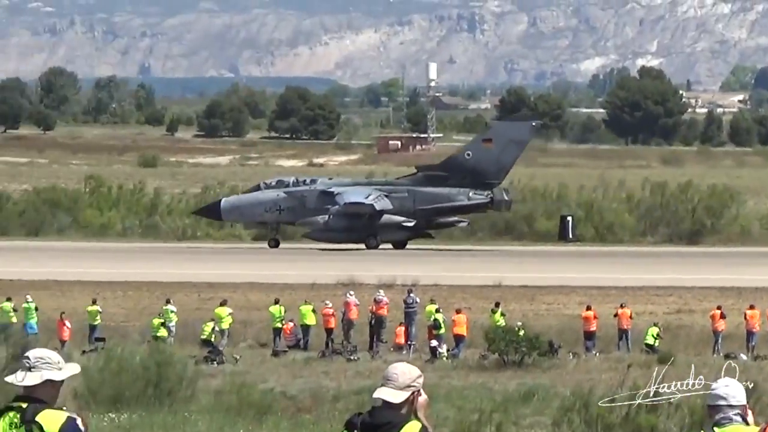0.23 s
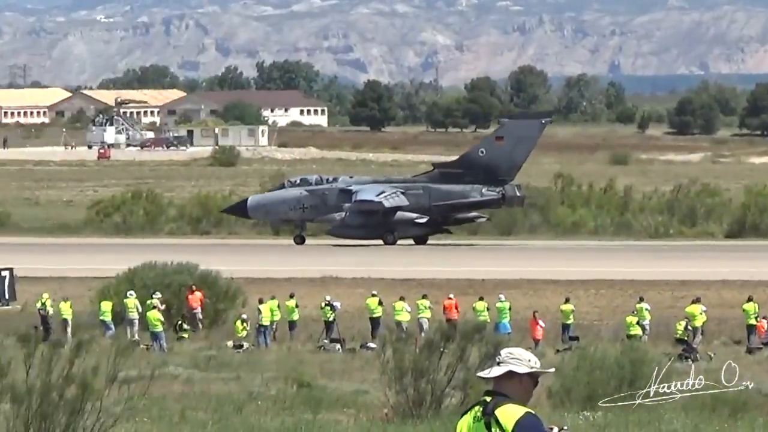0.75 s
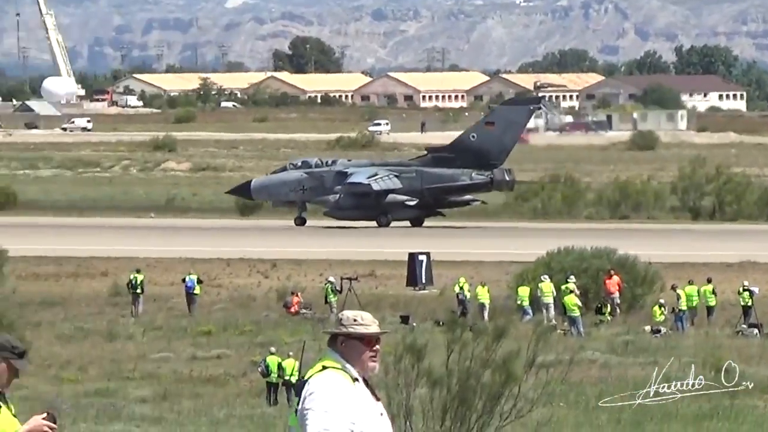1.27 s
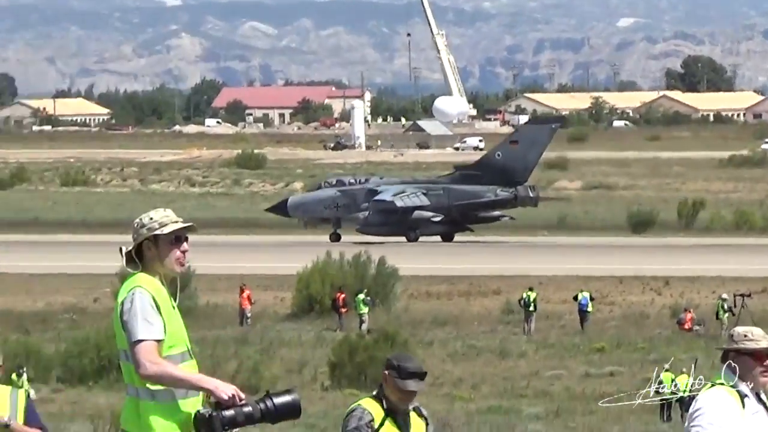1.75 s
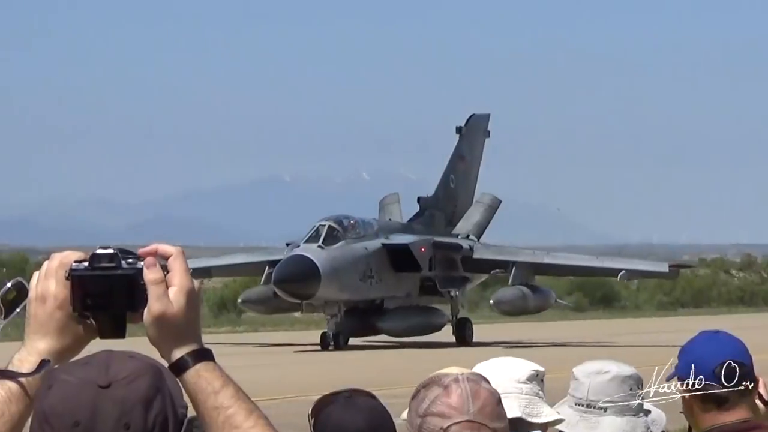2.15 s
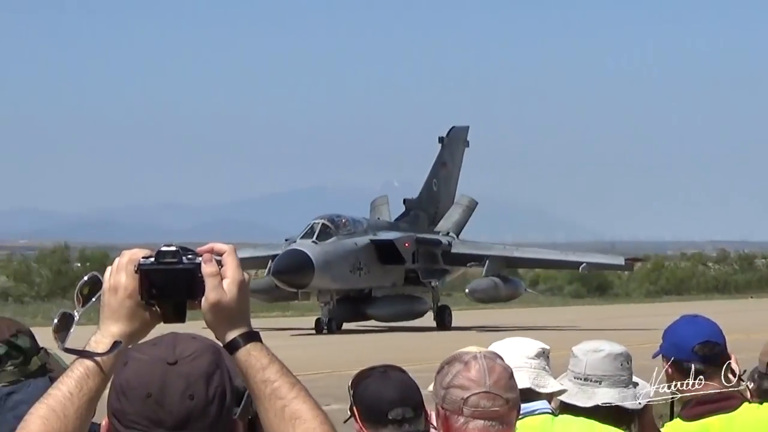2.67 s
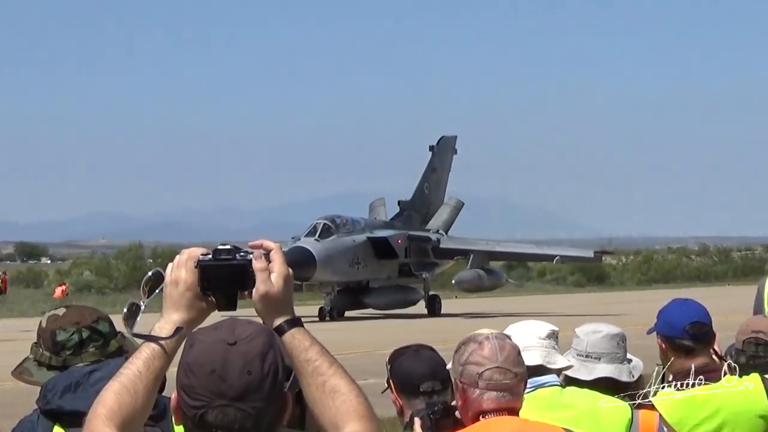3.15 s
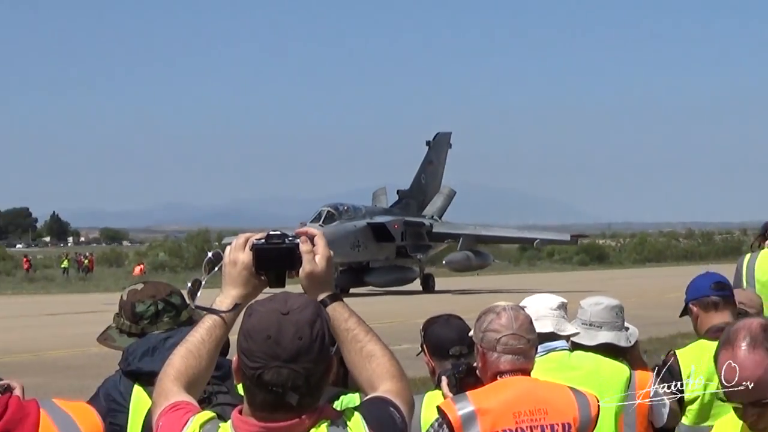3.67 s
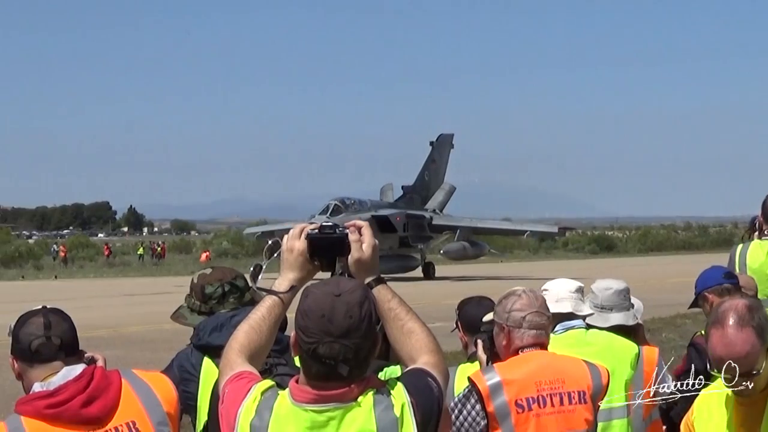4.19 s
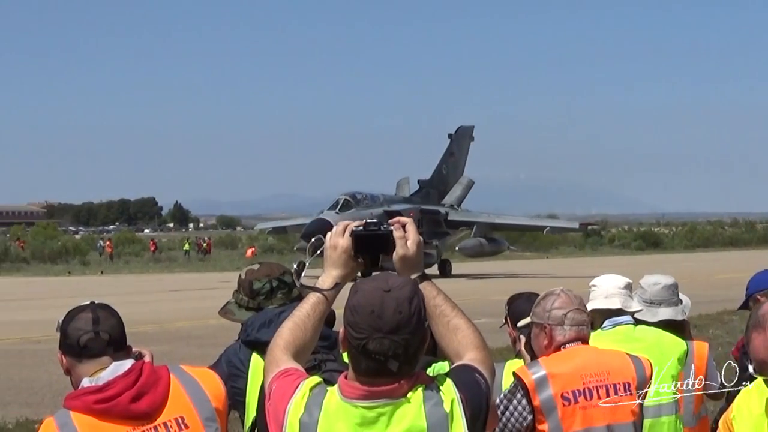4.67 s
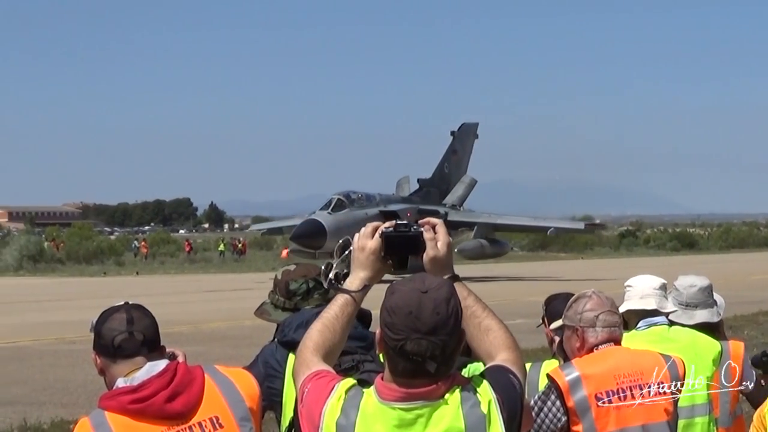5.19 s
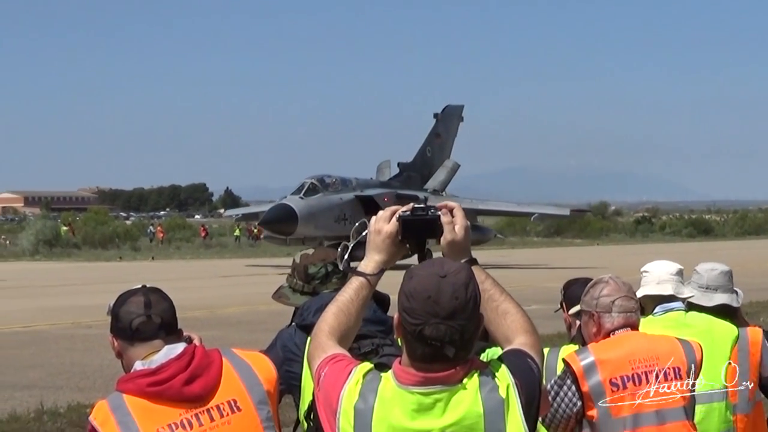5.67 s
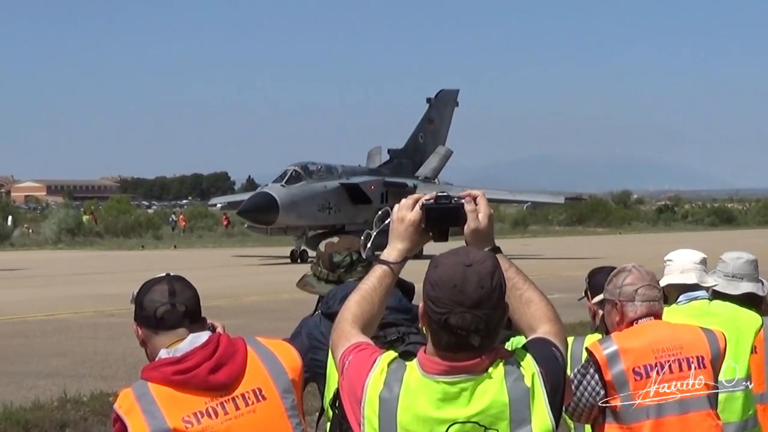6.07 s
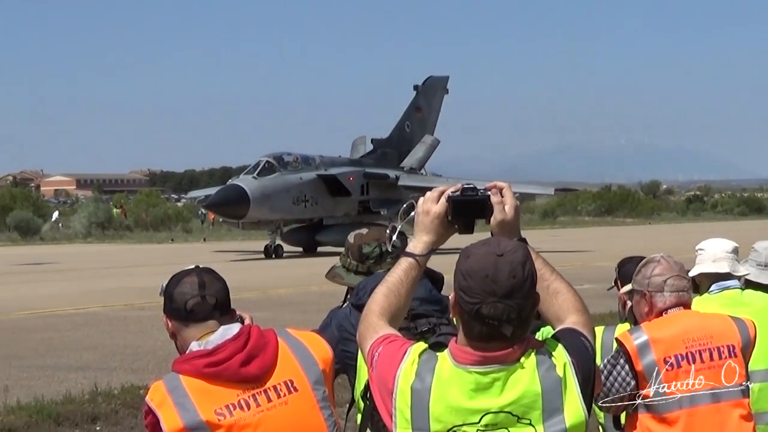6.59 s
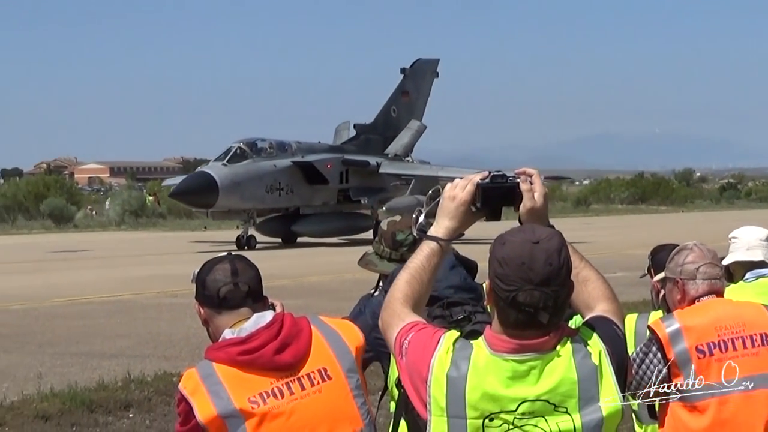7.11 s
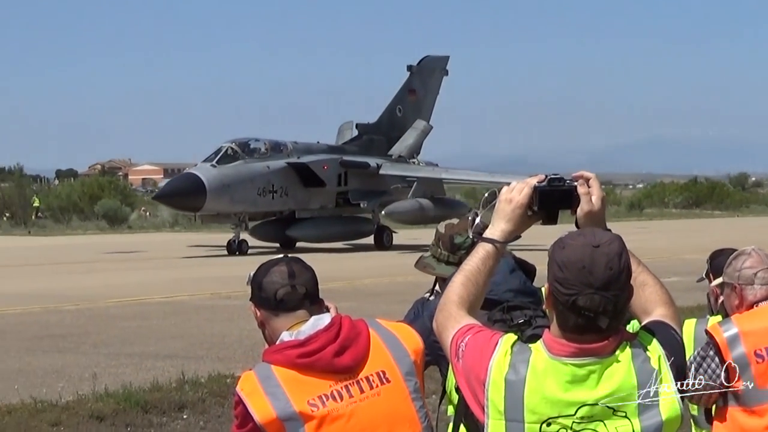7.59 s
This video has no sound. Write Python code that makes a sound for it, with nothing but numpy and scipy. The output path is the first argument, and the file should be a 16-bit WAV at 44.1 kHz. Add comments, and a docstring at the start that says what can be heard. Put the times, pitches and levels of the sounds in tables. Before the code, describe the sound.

Outdoors on an airfield, a distant military jet roars in uneven swells while low wind thumps the microphone and small dry camera shutters click. At about two seconds it switches abruptly to a much closer view: loud shimmering high engine whine, dense hiss and a subdued exhaust rumble, steady until the pitch rises very slightly near the end.

```python
"""Taxiing military jet

A twin-engined military jet taxis on an airfield, heard from two places joined by a brief fade.
Far off and side-on, its exhaust roar is shaped noise swelling in drifting air; low noise buffets the
microphone as wind, and short bursts of noise make the clicks of camera shutters.
Close and nose-on, noise bands and wavering tones make the whine of the intakes, with broadband hiss
over a low exhaust rumble; the engines speed up slightly near the end."""
import sys
import numpy as np
from scipy import signal
from scipy.fft import rfft, irfft, next_fast_len
from scipy.io import wavfile
from scipy.ndimage import uniform_filter1d, map_coordinates

SR = 44100
rng = np.random.default_rng(int(sys.argv[2]) if len(sys.argv) > 2 else 0)


def to_wav(sig):
    """Store sig (one row per channel, or 1-D mono) as 16-bit WAV at the path in sys.argv[1].

    Samples outside -1..1 are clipped; the rate is SR.
    """
    pcm = np.clip(np.atleast_2d(sig), -1, 1) * 32767
    pcm = np.round(pcm).astype(np.int16)
    wavfile.write(sys.argv[1], SR, pcm.T)  # frames by channels


N = 346185

CLOSE_S = 1.945  # the close view begins

# Likeness of left and right in distant sound. Each row: frequency in Hz, correlation (no unit).
FAR_ALIKE = [(100, .7), (280, 0.61), (640, 0.93), (1400, 0.96), (3000, 0.97)]
# Likeness of left and right in close sound. Each row: frequency in Hz, correlation (no unit).
NEAR_ALIKE = [(60, 0.93), (290, 0.91), (700, 0.94), (1100, 0.97), (1400, .999), (4000, 0.96), (7000, 0.95),
              (7600, 1)]


def amp(db):
    """Decibels to amplitude ratio: 20 dB is a factor of ten."""
    return 10 ** (np.asarray(db) / 20)


def unit(x):
    """Normalisation to a root-mean-square value of 1."""
    return x / np.sqrt(np.mean(x ** 2) + 1e-20)


def clock():
    """Sampled time in seconds."""
    return np.arange(N) / SR


def since_close():
    """Elapsed time in seconds of the close view, zero before it."""
    return np.maximum(clock() - CLOSE_S, 0)


def along(points, hz):
    """Interpolation of (Hz, value) points on a logarithmic frequency axis."""
    f, v = np.transpose(points)
    return np.interp(np.log(hz + 1), np.log(f + 1), v)


def curve(rows):
    """Linear interpolation of (seconds, value) rows at every sample."""
    s, v = np.transpose(rows)
    return np.interp(clock(), s, v)


def wobble(rate):
    """Slow random fluctuation: a spline through random knots, rate of them a second."""
    knots = rng.standard_normal(int(N * rate / SR) + 4)
    return map_coordinates(knots, [np.arange(N) * rate / SR])


def filtered(x, response):
    """Linear filtering: the spectrum of x times a response of frequency."""
    m = next_fast_len(N + SR // 2)
    hz = np.fft.rfftfreq(m, 1 / SR)
    return irfft(rfft(x, m) * response(hz), m)[..., :N]


def slope(points):
    """Broadband spectral gain that falls 12 dB per octave further below its first point."""
    return lambda hz: amp(along(points, hz)) * np.minimum(hz / points[0][0], 1) ** 2


def humps(bands):
    """Incoherent addition: the powers of separate noise bands add."""
    def gain(hz):
        power = sum(amp(db) ** 2 / (1 + 2 * ((hz - c) / w) ** 2) ** 2 for c, w, db in bands)
        return np.sqrt(power)
    return gain


def rush(colour, alike, patchy_db):
    """Turbulence noise: stereo, of rms 1, with patches of random gain in time and frequency."""
    z = signal.stft(rng.standard_normal((2, N)), nperseg=512)[2]
    field = rng.standard_normal(z.shape[1:])
    field = uniform_filter1d(uniform_filter1d(field, size=7, axis=0), size=16, axis=1)
    pair = signal.istft(z * amp(patchy_db * unit(field)), nperseg=512)[1][:, :N]

    def mid_side_gain(hz):
        # the split between mid and side sets the correlation of left and right
        angle = np.arccos(np.clip(along(alike, hz), -1, 1)) / 2
        return colour(hz) * np.array([np.cos(angle), np.sin(angle)])

    mid, side = filtered(pair, mid_side_gain)
    return unit(np.array([mid + side, mid - side]))


def panned(x, db):
    """Stereo placing by a level difference, left minus right in dB."""
    return x * amp(np.array([db, -db]).reshape(2, -1) / 2)


def surges(rows, attack_s, release_s, lead_s=0):
    """Incoherent addition, in dB over a base: each surge rises, holds and dies away; powers add."""
    t = clock() + lead_s
    power = 1
    for s, hold, db in rows:
        rise = np.minimum(t - s, 0) / attack_s
        fall = np.maximum(t - s - hold, 0) / release_s
        power = power + (amp(db) * np.exp(rise - fall)) ** 2
    return 10 * np.log10(power)


def ducted(colour):
    """Waveguide cutoff: the intake ducts let little out at low frequencies."""
    duct_hz = 1670
    return lambda hz: colour(hz) / np.sqrt(1 + (duct_hz / (hz + 1)) ** 20)


def spun(pair, spin):
    """Frequency scaling: noise read at the pace of the rotor, so that its pitch follows engine speed."""
    return unit(np.array([map_coordinates(x, [spin], order=5, mode="wrap") for x in pair]))


def intakes():
    """Rotor noise: blades chop the inflow into whine that follows engine speed, under broadband hiss."""
    # Engine speed. Each row: time in seconds, speed as a share of idle (no unit).
    engine_speed = [(2, 1), (4.4, .999), (6.1, 1.001), (6.45, 1.004), (6.9, 1.009), (7.3, 1.012),
                    (7.85, 1.013)]
    speed = curve(engine_speed)
    spin = np.cumsum(speed)  # turning of the rotors, in samples at idle
    shimmer = wobble(22)  # hot air disturbs the short waves most
    whine = (fan_whine(speed, spin) + compressor_whine(spin)) * amp(0.17 * shimmer)
    pan_db = -0.65 + 0.06 * since_close()  # the whine drifts left as the jet rolls
    return panned(whine, pan_db) + inflow_hiss(spin) * amp(0.35 * shimmer)


def fan_whine(speed, spin):
    """Blade-passing noise: broad bands with wavering tones among them."""
    # Level of the fan before its trim. Each row: time in seconds, level in dB.
    fan_level = [(1.98, -20.5), (2.03, -22), (2.7, -25.5), (3.45, -18), (3.92, -23), (4.15, -20),
                 (4.63, -22.5), (4.77, -20.5), (5.14, -24), (5.54, -22.5), (5.79, -24), (6.07, -20),
                 (6.65, -25), (6.96, -23), (7.8, -20), (7.85, -24.5)]
    # Bands of fan noise at idle. Each row: centre in Hz, nominal width in Hz, relative level in dB.
    fan_bands = [(2854, 216, -2), (2984, 46, -2.5), (3090, 120, -8)]
    # Lower bands of fan noise at idle. Each row: centre in Hz, nominal width in Hz, relative level in dB.
    low_bands = [(1879, 240, 2), (2184, 170, -2.5), (2396, 140, -1.5)]
    # Blade tones. Each row: frequency at idle in Hz, mean peak level against the fan noise in dB,
    # gain in dB once the engines turn 1 % faster.
    tone_rows = [(2386, -12.5, -9), (3002, -7, 3.5), (3817, -12.5, 0), (4772, -13, -5)]
    fan_db = curve(fan_level) - 1.84
    low_db = fan_db - 3 - 0.44 * since_close()  # the low bands fade as the nose swings away
    low_fan = amp(low_db) * spun(rush(ducted(humps(low_bands)), NEAR_ALIKE, patchy_db=1), spin)
    fan = amp(fan_db) * spun(rush(humps(fan_bands), NEAR_ALIKE, patchy_db=0.9), spin)
    throttle = np.interp(speed, [1, 1.01], [0, 1])
    tones = 0
    for hz, db, gain_db in tone_rows:
        tone_db = fan_db + db + gain_db * throttle + 3.1 * wobble(5)
        tones = tones + amp(tone_db) * blade_tone(hz, spin)
    return low_fan + fan + tones


def blade_tone(hz, spin):
    """Phase modulation: a rotor's sine tone is shaken by the air on the way."""
    shake_rad = hz / 3000 * (.9 * wobble(6) + .35 * wobble(60))
    return np.sin(2 * np.pi * hz * spin / SR + shake_rad)


def compressor_whine(spin):
    """Blade-passing noise of the compressor, with one narrow band that is directional."""
    # Level of the compressor before its trim. Each row: time in seconds, level in dB.
    compressor_level = [(2.0, -20), (2.41, -17.5), (2.63, -24), (3.07, -21.5), (3.16, -25), (3.94, -20.5),
                        (4.39, -21), (4.64, -19), (4.78, -22), (5.37, -16.5), (5.91, -22), (6.4, -17),
                        (6.77, -19), (7.85, -18.5)]
    # Bands of compressor noise at idle. Each row: centre in Hz, nominal width in Hz, relative level in dB.
    compressor_bands = [(3420, 310, -10), (3680, 220, -8.5), (3788, 82, -0.5), (4213, 320, -3),
                        (4520, 190, -9), (4746, 150, -5), (5350, 180, -14.5)]
    compressor_db = curve(compressor_level) - 1
    compressor = amp(compressor_db) * spun(rush(humps(compressor_bands), NEAR_ALIKE, patchy_db=0), spin)
    # a narrow band near 3.8 kHz beams straight ahead and is lost as the nose swings away
    beam_db = compressor_db + np.interp(clock(), [2.45, 2.75], [-7, -17])
    beam = amp(beam_db) * spun(rush(humps([(3834, 110, 0)]), NEAR_ALIKE, patchy_db=-2.0), spin)
    return compressor + beam


def inflow_hiss(spin):
    """Turbulence noise of the inflow, with high blade bands that rise and fall with it."""
    # Level of the hiss before its trims. Each row: time in seconds, level in dB.
    hiss_level = [(2.02, -25.5), (2.16, -27), (2.37, -24), (2.88, -27.5), (3.34, -22), (3.59, -23.5),
                  (3.89, -20.5), (4.14, -23), (4.34, -21.5), (5.54, -23.5), (5.8, -20.5), (6.35, -24),
                  (6.85, -21), (7.03, -25.5), (7.25, -21.5), (7.61, -24.5), (7.69, -22), (7.82, -21.5)]
    # Spectrum of the hiss. Each row: frequency in Hz, relative density in dB.
    hiss_spectrum = [(1500, -17), (3000, -4), (5000, 3.5), (6300, -1), (7700, 0.5), (8300, 1), (9200, 0),
                     (10000, -7.5), (11500, -21), (14000, -48), (16000, -80)]
    # Spectrum of the finest hiss. Each row: frequency in Hz, relative density in dB.
    spray_spectrum = [(7500, -18), (9500, 1), (10300, 0), (11200, -0.5), (12200, -8), (13200, -10),
                      (14200, -22), (15000, -37)]
    # Upper blade bands at idle. Each row: centre in Hz, nominal width in Hz, relative level in dB.
    upper_bands = [(5300, 160, 0.5), (5940, 300, -1.5), (6660, 170, -2), (7180, 250, -0.5)]
    hiss_db = curve(hiss_level)
    hiss = amp(hiss_db + 1) * rush(ducted(slope(hiss_spectrum)), NEAR_ALIKE, patchy_db=1.55)
    upper = amp(hiss_db - 6.5) * spun(rush(humps(upper_bands), NEAR_ALIKE, patchy_db=1.5), spin)
    # the finest hiss swings wider than the rest
    swing_db = hiss_db - hiss_db[clock() > CLOSE_S].mean()
    spray_db = -32 + 1.2 * swing_db + 1.0 * wobble(12)
    spray = amp(spray_db) * rush(slope(spray_spectrum), NEAR_ALIKE, patchy_db=2.0)
    return upper + hiss + spray


def exhaust():
    """Jet-noise directivity: rumble and roar swell together; the roar changes colour in the turn."""
    # Level of the exhaust before its trims. Each row: time in seconds, level in dB.
    exhaust_level = [(2.05, -36), (2.08, -37.5), (3.1, -31.5), (3.8, -33.5), (4.03, -36.5), (4.72, -35.5),
                     (4.8, -33.5), (6.27, -33.5), (6.45, -39.5), (6.53, -35.5), (7.08, -34), (7.35, -38.5),
                     (7.4, -33.5), (7.65, -33.5), (7.75, -36)]
    # Spectrum of the rumble. Each row: frequency in Hz, relative density in dB.
    rumble_spectrum = [(15, -59), (25, -30), (124, -10), (162, -3.5), (228, -6), (283, -2), (351, -8),
                       (452, -7.5), (520, -4), (680, -6.5), (1140, -120)]
    # Spectrum of the roar before the turn. Each row: frequency in Hz, relative density in dB.
    ahead_spectrum = [(250, -45), (420, -8), (466, -21.5), (513, -14), (566, -9.5), (616, -10.5), (905, -2),
                      (1090, -7), (1260, -2.5), (1590, -5.5), (1800, -4), (2340, -16), (3960, -120)]
    # Spectrum of the roar after the turn. Each row: frequency in Hz, relative density in dB.
    abeam_spectrum = [(250, -47), (420, -7.5), (444, -9), (533, -1.5), (605, 0.5), (647, 0), (696, -9.5),
                      (888, -1.5), (1110, -5.5), (1320, 0), (1460, -3), (1620, -2.5), (1800, -8),
                      (2340, -45), (3960, -120)]
    level_db = curve(exhaust_level)
    turn = np.clip((clock() - 4.3) / 1.72, 0, 1) * np.pi / 2  # equal-power crossfade
    ahead = rush(slope(ahead_spectrum), NEAR_ALIKE, patchy_db=0.94)
    abeam = rush(slope(abeam_spectrum), NEAR_ALIKE, patchy_db=0.94)
    roar = amp(level_db + 4.5) * (np.cos(turn) * ahead + np.sin(turn) * abeam)
    rumble_db = level_db - 2 - 0.62 * since_close()  # the rumble thins as the aircraft turns
    return roar + amp(rumble_db) * rush(slope(rumble_spectrum), NEAR_ALIKE, patchy_db=1.0)


def distant_jet():
    """Interference and drift: ground reflection ripples the roar's spectrum; drifting air swells it."""
    # Swells of the roar. Each row: start in seconds, hold in seconds, level over the lull in dB.
    swell_rows = [(.27, 0.069, 6.5), (.33, 0.12, 9), (.62, .02, 5.5), (.75, 0.12, 9.5), (1.13, .07, -2),
                  (1.44, .1, 10.5), (1.61, 0.14, 6.5), (1.85, 0.049, 4)]
    # Spectrum of the roar. Each row: frequency in Hz, relative density in dB.
    roar_spectrum = [(200, -24), (300, -13.5), (470, -11), (620, -1), (700, 0.5), (810, -4.5), (930, -8.5),
                     (1130, -2), (1300, -8.5), (1500, -16), (2200, -42), (6000, -120)]
    # Spectrum of its treble. Each row: frequency in Hz, relative density in dB.
    treble_spectrum = [(1200, -8), (1500, -2), (1750, 0.5), (2200, -6.5), (2600, -6), (3300, -10),
                       (4400, -15), (5500, -23.5), (7200, -35.5), (10000, -56), (15000, -62)]
    attack_s, release_s = 0.032, 0.057
    roar_db = -29.5 + surges(swell_rows, attack_s, release_s)
    # the treble swells less, and slightly earlier
    treble_db = -30.5 + 0.63 * surges(swell_rows, attack_s, release_s, lead_s=0.019)
    roar = amp(roar_db) * rush(slope(roar_spectrum), FAR_ALIKE, patchy_db=1.5)
    treble = amp(treble_db) * rush(slope(treble_spectrum), FAR_ALIKE, patchy_db=1.64)
    return panned((roar + treble) * amp(1.3 * wobble(44.7)), db=-1)


def wind():
    """Turbulent pressure: eddies hit each microphone port separately, over a faint hiss in the grass."""
    # Gusts. Each row: start in seconds, hold in seconds, level over the breeze in dB.
    gust_rows = [(.06, .02, 2.5), (.24, 0.054, 2.5), (.6, 0.083, 7.5), (.7, 0.082, 3.5), (1.15, .02, 1),
                 (1.29, .03, -1), (1.73, 0.055, 4)]
    # Spectrum of the buffeting. Each row: frequency in Hz, relative density in dB.
    buffet_spectrum = [(25, -30), (45, -21), (85, -10.5), (140, -2.5), (190, 0), (260, -1.5), (400, -4.5),
                       (540, -5), (750, -31), (1200, -120)]
    breeze_db = -25.5 - 3 * clock()  # the breeze dies down
    wind_db = breeze_db + surges(gust_rows, attack_s=0.035, release_s=.035)
    lumps = amp(2.5 * np.array([wobble(54.44), wobble(55.8)]))
    buffet_alike = [(60, 0.75), (130, 0.66), (290, 0.27)]  # (Hz, correlation)
    eddies = rush(slope(buffet_spectrum), buffet_alike, patchy_db=1.5)
    buffet = amp(wind_db) * unit(lumps * eddies)
    grass_colour = slope([(5000, 6.5), (10500, -4.5), (15000, -14)])
    grass = amp(-53.5 + 2 * wobble(120)) * rush(grass_colour, FAR_ALIKE, patchy_db=-2.5)
    return buffet + grass


def shutters():
    """Impulsive excitation: small dry camera clicks decay exponentially, with one soft rustle."""
    # Clicks. Each row: start in seconds, initial level before a trim in dB, 60 dB decay time in seconds.
    click_rows = [(.901, -30, .018), (1.001, -28, .02), (1.714, -23, .018), (1.734, -23, .02),
                  (1.743, -24, .025), (1.768, -27, .015), (1.845, -37, .06), (1.861, -14.5, .008),
                  (1.873, -38, .03)]
    t = clock()
    level = sum(amp(db - 8.5 - 60 * np.abs(t - s) / t60) * (t >= s) for s, db, t60 in click_rows)
    rustle = amp(-46) * np.exp(-((t - 1.505) / .03) ** 2)
    colour = slope([(3000, -8), (6500, 0.0), (8500, -4), (10300, -2), (12500, -10), (15000, -19.5)])
    return (level + rustle) * unit(filtered(rng.standard_normal(N), colour))


def ports(hz):
    """Interchannel level and phase difference: the left and right responses of the microphone."""
    # Each row: frequency in Hz, left minus right level in dB, phase by which left leads in radians.
    port_rows = [(80, 0.5, -0.012), (340, -1, -0.37), (700, -2, -0.31), (1100, -2, -.26),
                 (1280, -1.1, 0.047), (2500, 1, -0.079), (4250, 0.5, -0.24), (4800, 3, -.15),
                 (5450, 1, -0.17), (6700, -1, -.24), (7300, -1.8, -.1), (7800, 0, 0)]
    f, db, lead = np.transpose(port_rows)
    half = amp(np.interp(hz, f, db) / 2) * np.exp(1j * np.interp(hz, f, lead) / 2)
    return np.array([half, 1 / half])


def scene():
    """Superposition of the sources: the far view fades out just before the close one fades in."""
    t = clock()
    fade_out = np.clip((CLOSE_S - t) / .022, 0, 1) ** 1.3
    fade_in = np.clip((t - CLOSE_S) / .026, 0, 1) ** 1.4
    close = exhaust() + intakes()
    far = distant_jet() + wind() + shutters()
    return fade_out * far + fade_in * close


def record(dry):
    """Saturation and band limiting: the ports colour the sound, high peaks are rounded, the top is cut."""
    x = filtered(dry, ports)
    x = x / (1 + np.abs(x / .68) ** 8) ** (1 / 8)
    return filtered(x, lambda hz: hz < 14900)


dry = scene()
out = record(dry)
to_wav(out)
```